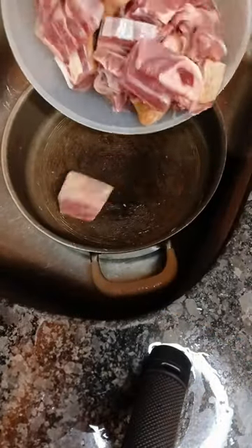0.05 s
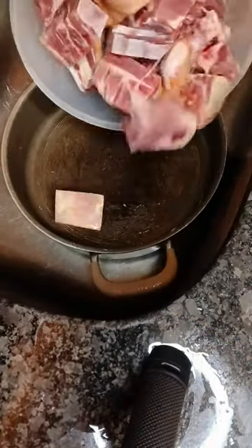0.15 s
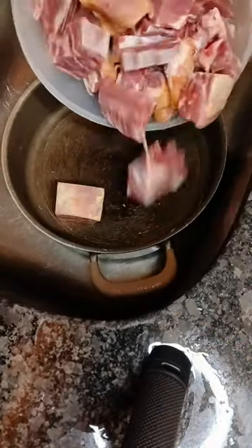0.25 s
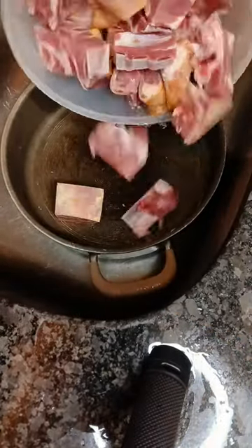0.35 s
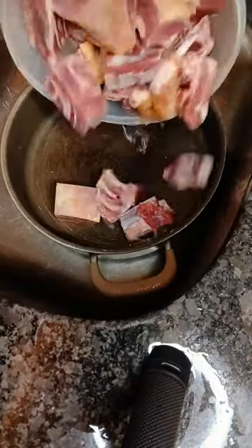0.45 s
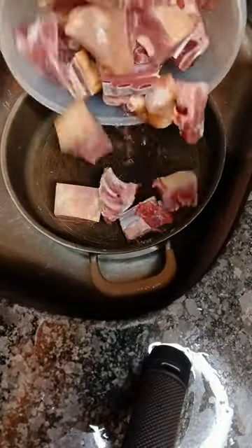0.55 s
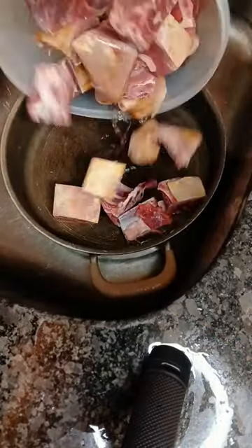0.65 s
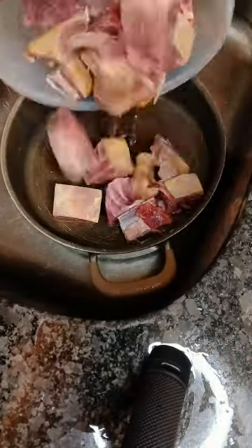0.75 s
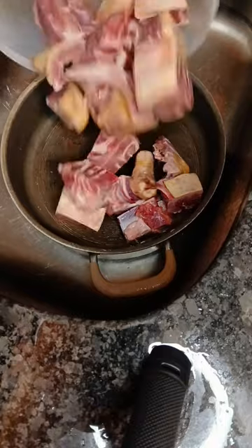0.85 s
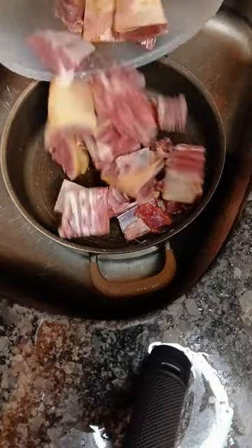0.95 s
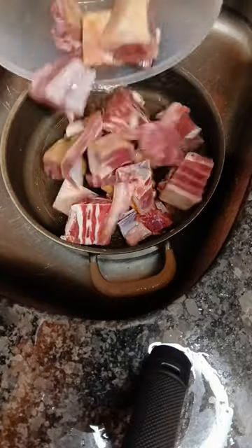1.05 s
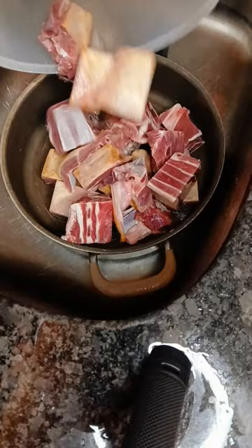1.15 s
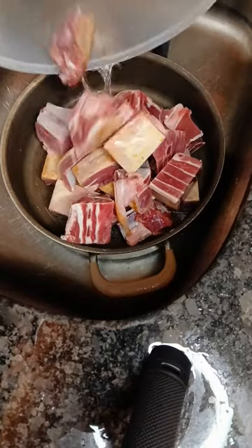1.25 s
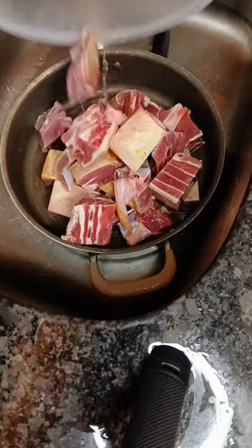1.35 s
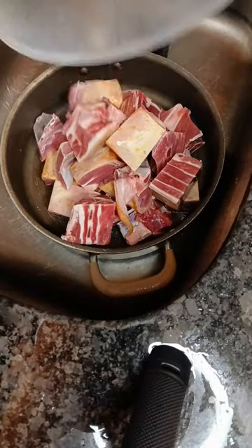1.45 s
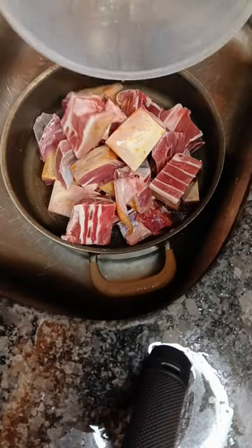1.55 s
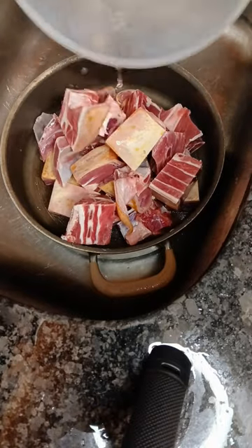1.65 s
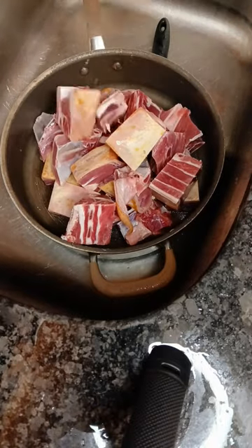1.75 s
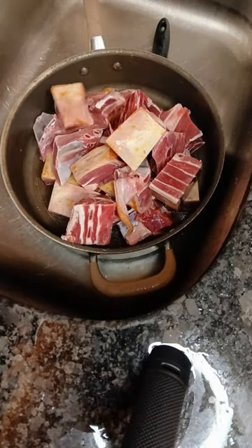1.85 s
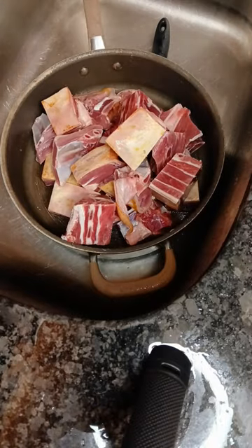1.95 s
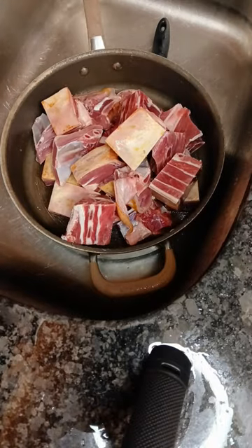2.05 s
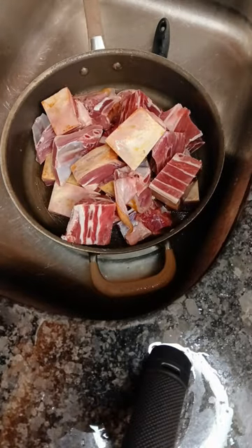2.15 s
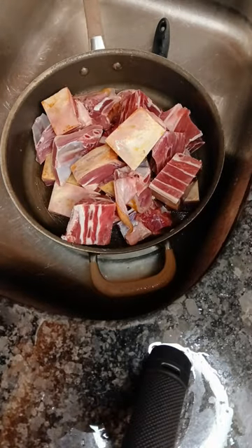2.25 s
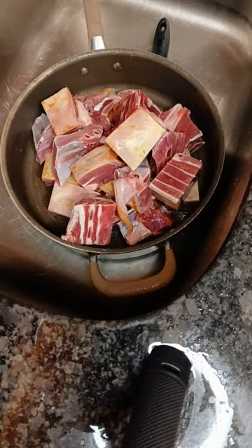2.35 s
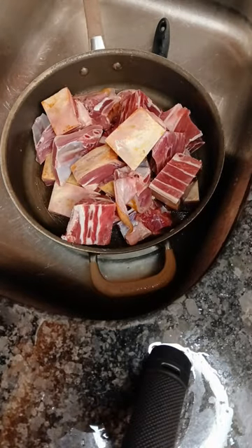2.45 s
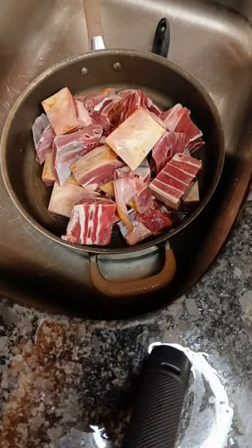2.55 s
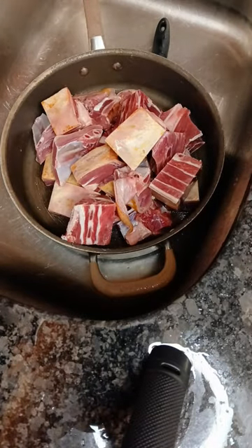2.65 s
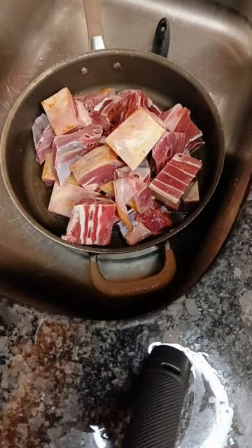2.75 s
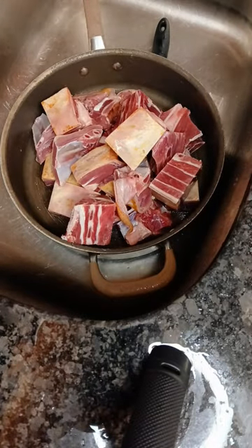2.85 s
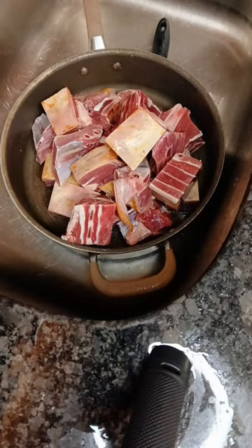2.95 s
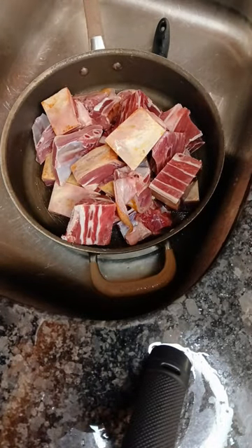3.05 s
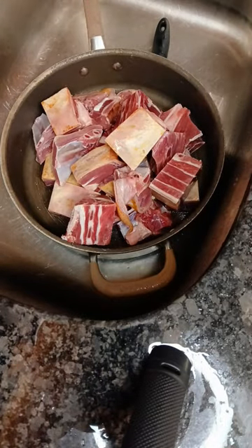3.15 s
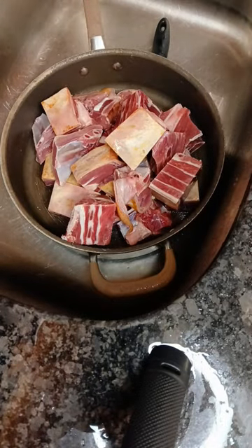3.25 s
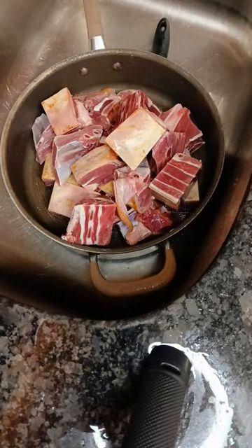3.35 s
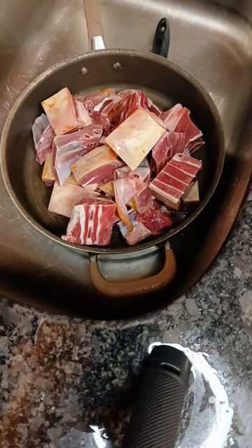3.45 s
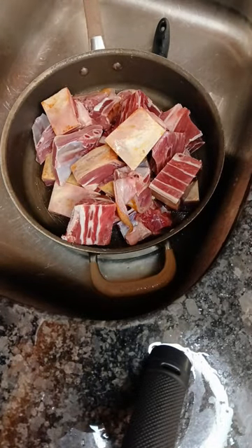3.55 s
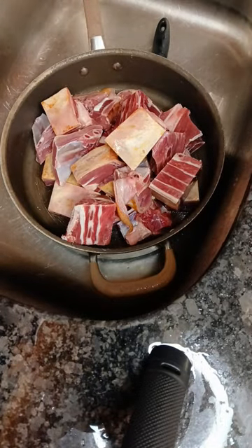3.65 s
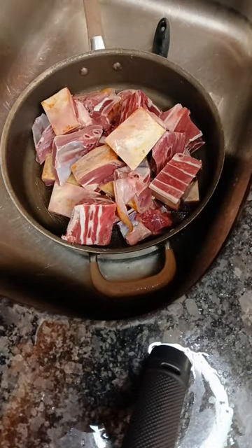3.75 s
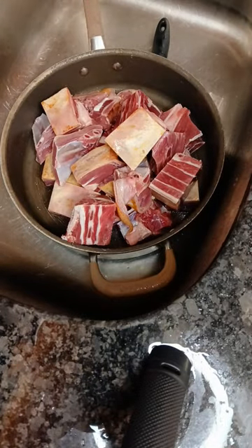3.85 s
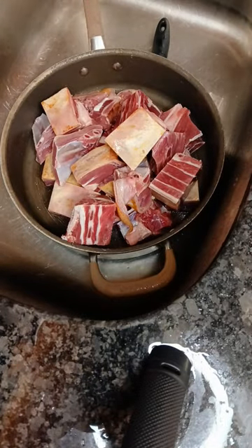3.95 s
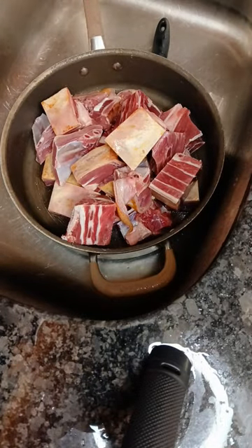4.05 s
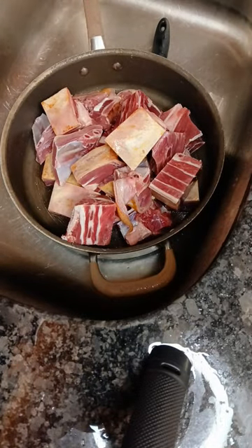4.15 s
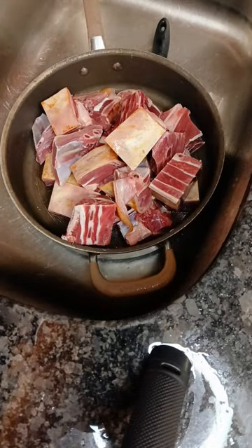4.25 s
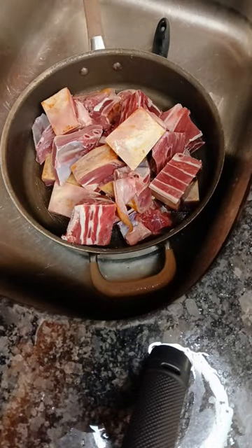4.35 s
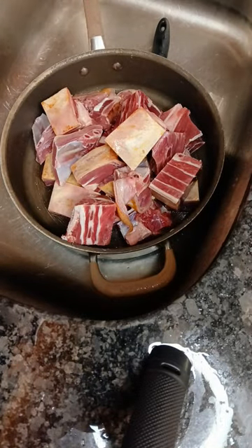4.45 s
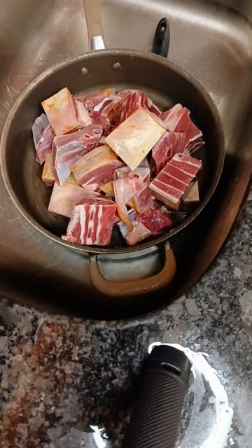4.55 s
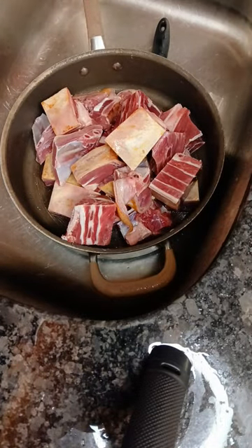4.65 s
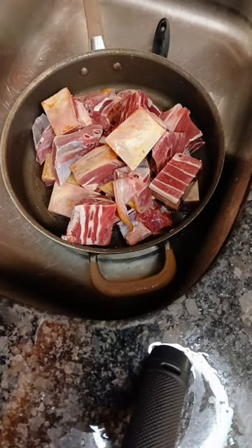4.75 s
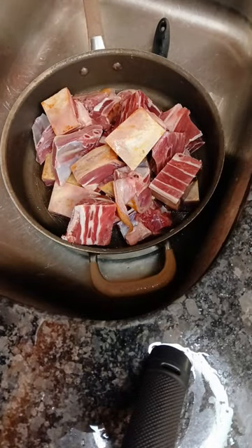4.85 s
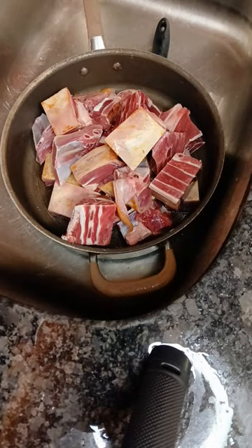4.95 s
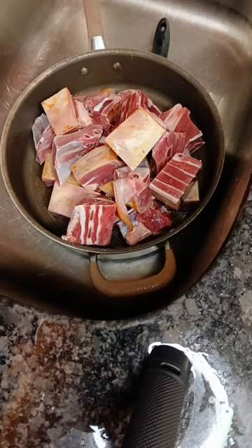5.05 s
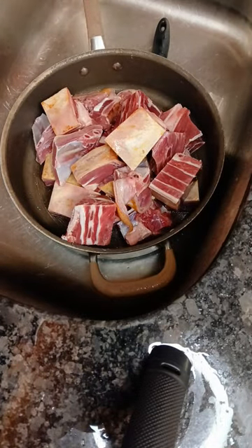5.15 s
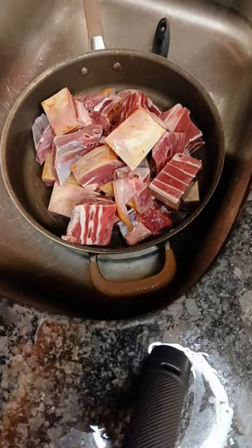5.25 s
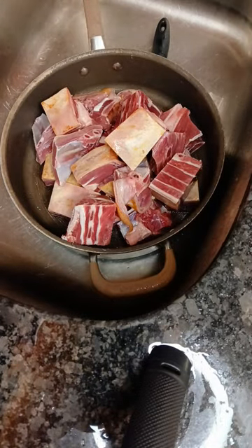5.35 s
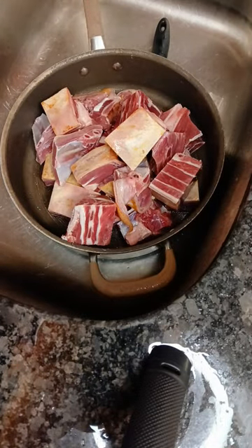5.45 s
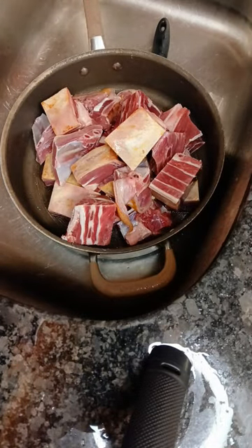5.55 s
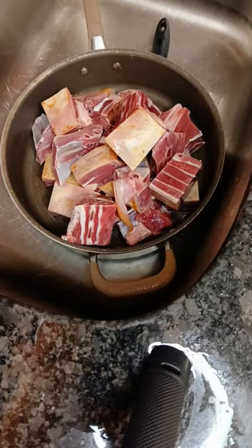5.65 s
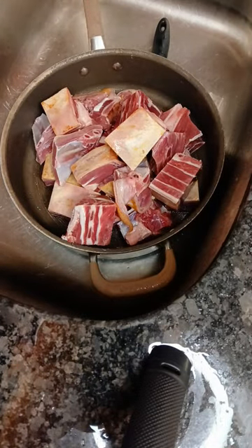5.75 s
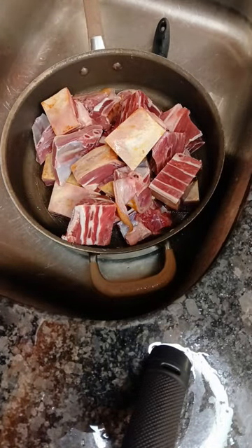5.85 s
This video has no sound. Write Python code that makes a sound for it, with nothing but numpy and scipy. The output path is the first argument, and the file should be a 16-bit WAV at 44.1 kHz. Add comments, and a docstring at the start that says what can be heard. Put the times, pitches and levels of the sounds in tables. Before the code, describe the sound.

Wet chunks of meat on the bone tumble into a metal pot in a steel sink, a quick run of thuds, knocks and splats with squelching and a short, dull ring. An empty plastic bowl is then set on a stone counter with a loud clack. Soft footsteps and scuffs follow, with a brief rattle and faint jingling of small metal parts. The sound is close, in a small kitchen with a low appliance hum.

```python
"""Wet meat on the bone tumbles from a plastic bowl into a metal pot in a steel sink, over kitchen hum.
The heap squelches; each chunk knocks, splats, rings the pot wall and thuds the bottom.
Near 2 s the empty bowl clacks down on the counter and small metal parts begin to jingle.
From 2.5 s soft footfalls thump the floor and soles scuff. At 3.2 s something loose briefly rattles
to rest. Jingling goes on to 5.4 s, steps to 5.7 s."""
import sys
import numpy as np
from scipy import signal
from scipy.io import wavfile
from scipy.ndimage import uniform_filter1d

SR = 44100
rng = np.random.default_rng(int(sys.argv[2]) if len(sys.argv) > 2 else 0)


def log_audio(samples):
    """Write samples as a 16-bit WAV file to the path given in sys.argv[1]."""
    # one column per channel
    frames = np.atleast_2d(samples).T
    # limit to full scale, then quantise
    limited = np.clip(frames, -1, 1)
    pcm = np.round(limited * 32767).astype(np.int16)
    wavfile.write(sys.argv[1], SR, pcm)


N = 260190

# chunks landing: start_s, knock_db, knock_hz, splat_db, bottom_db, wall_db
LANDINGS = [(0.0, -42, 1020, -66, -19, -17), (0.035, -14, 1100, -66, -28, -17),
            (0.101, -10.5, 2910, -24.5, -18.5, -17.5), (0.124, -20, 961, -53, -35, -15.5),
            (0.227, -17, 902, -58, -18, -12), (0.234, -4.5, 966, -17.5, -12, -12.5),
            (0.266, -10.5, 2290, -25, -23, -21.5), (0.305, 6, 1164, -27.5, -13.5, -21),
            (0.329, -15, 964, -48.5, -12.5, -12), (0.43, -3, 1330, -29, -27, -25),
            (0.48, -45, 1115, -27, -29, -33), (0.506, -3, 1010, -64, -14, -17),
            (0.598, -10.5, 902, -35, -15, -18), (0.613, -14.5, 3390, -22, -18, -8),
            (0.702, -22, 1121, -53, -36, -15.5), (0.737, -39, 1588, -29.5, -23, -25.5),
            (0.814, -15.5, 2196, -23, -10.5, -18.5), (0.882, -31, 3000, -21, -29, -29),
            (0.904, -14, 1320, -29.5, -28, -20), (0.932, -0.5, 1210, -24, -10.5, -15.5),
            (0.958, -44, 1230, -25, -16.5, -24), (0.989, -14, 1080, -23, -18, -21),
            (1.005, -7.5, 3510, -37, -18, -20), (1.06, -21, 1330, -26.5, -17.5, -31.5),
            (1.112, -6.5, 1060, -39, -27, -28.5), (1.245, -34, 1490, -33.5, -19, -52),
            (1.292, -35, 1460, -30, -42, -46), (1.314, -13, 5700, -45, -53, -25.5),
            (1.369, -29.5, 3380, -44, -28, -37), (1.446, -19.5, 1430, -32.5, -32.5, -54),
            (1.593, -32, 3300, -31.5, -44, -74)]
# pot wall modes: pitch_hz, level_db, t60_s
WALL_MODES = [(223.3, -7.5, 0.16), (258.2, -7, 0.13), (354, -5.5, 0.081), (511, -8, 0.044),
              (643.6, -6.5, 0.15), (874, -17, 0.175), (1020, -43, 0.038), (1140, -14.5, 0.46),
              (1200, -26.5, 0.093), (2100, -27.5, 0.21), (2990, -17, 0.21)]
# pot bottom beating with the sink under it: pitch_hz, level_db, t60_s
BOTTOM_MODES = [(112.75, 1.5, .45), (87.3, -7, 0.1)]
# room noise: frequency_hz, density_db
ROOM_SPECTRUM = [(25, -6), (60, 3.5), (120, -18.5), (300, -12), (500, -18.5), (1000, -27), (1550, -25.5),
                 (3400, -29.5), (6000, -28.5), (15000, -20)]
# appliance hum: pitch_hz, width_hz, level_db
HUM_BANDS = [(151, 10, -68), (246.4, 12.4, -60.5), (360.3, 8.6, -59.5)]
# bowl touching the counter: start_s, ring_db, clack_db
BOWL_HITS = [(1.847, -57, -18.5), (1.872, -49, -8), (2.109, -14.5, 14)]
# bowl modes: pitch_hz, level_db, t60_s
BOWL_MODES = [(80, -8, .45), (118, -4, .3), (250, -9, .2), (328, -6, .3), (425, -1.5, .2), (484, -1, .27),
              (533, -2, .2), (595, -5, .2), (883, -7, .2), (1071, -5, .22), (1405, -9, .18)]
# counter's dense response: frequency_hz, gain_db
CLACK_SPECTRUM = [(150, -10.5), (450, -4.5), (1000, -3.5), (2000, -8.5), (4000, -19.5), (8000, -27.5),
                  (15000, -38)]
# clearest touches of the metal parts: start_s, level_db, favoured_hz
TOUCHES = [(1.9719, -58, 2240), (2.487, -57, 1610), (2.586, -56, 1580), (2.7637, -55, 1570),
           (2.8948, -53, 1530), (3.519, -50.5, 1580), (3.606, -53, 2290), (4.0914, -55, 3190),
           (4.1508, -50, 3320), (4.2944, -55, 3210), (4.4734, -40, 1530), (4.573, -52.5, 1560),
           (4.6347, -44.5, 1520), (4.704, -50, 1550), (4.772, -58, 3240), (4.85, -57, 3130),
           (5.1672, -47.5, 2290), (5.2506, -55, 1550), (5.3407, -53, 1530), (5.378, -55, 3200)]
# modes of the metal parts: pitch_hz, level_db, t60_s
METAL_MODES = [(1592, 12, 0.09), (2294, 9.5, 0.061), (3150, 17, 0.059), (4340, 14, 0.072)]
# footfalls: start_s, slap_db, thump_db, thump_hz
FOOTFALLS = [(2.509, -59, -35.5, 51), (3.142, -35, -32, 94), (3.717, -14.5, -24.5, 61),
             (3.748, -14.5, -24.5, 92.5), (3.782, -24, -27, 109), (3.878, 0.5, -19, 95.6),
             (3.95, -13.5, -29, 118), (4.212, -29, -39, 64.6), (4.381, -37, -50, 66.4),
             (4.72, -19, -35, 96.4), (5.177, -24.5, -60, 62.4), (5.399, -4.5, -34, 82.5),
             (5.438, -4.5, -41, 72.6), (5.498, -8.5, -24.5, 72.5), (5.71, -7.5, -33, 83)]
# floorboard response: frequency_hz, gain_db
FLOOR_SPECTRUM = [(60, -10), (150, -4.5), (400, -2.5), (850, -22), (1450, -13.5), (2200, -22),
                  (4000, -27.5), (8000, -98)]
# soles dragging: start_s, rise_s, hold_s, level_db
DRAGS = [(2.61, 0.085, 0.0045, -43.5), (3.186, 0.033, 0.0093, -38.5), (3.667, 0.097, 0.011, -41.5),
         (3.869, 0.0069, 0.069, -30.5), (4.182, 0.063, 0.014, -37.5), (4.31, 0.085, 0.092, -35),
         (5.362, 0.01, 0.0084, -34), (5.396, 0.024, 0.015, -21.5), (5.49, .05, 0.092, -30.5),
         (5.7, 0.034, 0.024, -36)]
# sole friction: frequency_hz, density_db
SCUFF_SPECTRUM = [(60, 11), (300, -4), (800, -9), (1500, -7.5), (4000, -7), (6000, -6), (9000, -5),
                  (15000, -2)]
# taps of the loose object: start_s, level_db
RATTLE_TAPS = [(3.1916, -25), (3.264, -13.5), (3.3222, -19.5), (3.3807, -14.5), (3.4436, -19),
               (3.5598, -27)]
# its broad modes: pitch_hz, width_hz, level_db
RATTLE_MODES = [(870, 26, 4.5), (1425, 46, 7.5), (1538, 26, 10), (2020, 120, 0), (2430, 110, -3.5),
                (2770, 120, -1), (3260, 130, -6.5), (3970, 53, -8)]
# kitchen reverberation: frequency_hz, t60_s
ROOM_DECAY = [(100, 0.48), (500, 0.32), (2000, 0.36), (6000, 0.39), (14000, 0.31)]
# microphone response: frequency_hz, gain_db
MIC_RESPONSE = [(25, -22.5), (70, 6.5), (4200, -2), (6500, -15), (7600, -14), (8400, -8.5), (15650, -21),
                (15850, -29)]

SINK_SIDE, COUNTER_SIDE = (0.33, -0.00017), (-4.5, 0.0004)  # left_over_right_db, left_lag_s


def gain_of(db):
    return 10 ** (np.asarray(db) / 20)


def unit_rms(x):
    return x / np.sqrt(np.mean(x ** 2) + 1e-20)


def curve_at(points, hz):
    points_hz, values = np.transpose(points)
    return np.interp(np.log(hz + 1), np.log(points_hz + 1), values)


def highpass(x, hz, order=2):
    return signal.sosfilt(signal.butter(order, hz, "high", fs=SR, output="sos"), x)


def resonate(x, hz, width_hz, passes=1):
    """Resonance with unity gain at its centre."""
    for _ in range(passes):
        x = signal.lfilter(*signal.iirpeak(hz, hz / width_hz, SR), x)
    return x


def colour(x, spectrum):
    """Minimum-phase filter; returns one row per channel."""
    log_gain = curve_at(spectrum, np.fft.rfftfreq(4096, 1 / SR)) * np.log(10) / 20
    mirrored = np.concatenate([log_gain, log_gain[-2:0:-1]])
    taps = np.fft.ifft(np.exp(np.conj(signal.hilbert(mirrored)))).real[:2048]
    return signal.oaconvolve(np.atleast_2d(x), taps[None])[:, :np.shape(x)[-1]]


def patchy_noise(spectrum, patch_db, correlation):
    """Stereo noise whose spectrum has drifting patches."""
    frames, hz = N // 256 + 5, np.fft.rfftfreq(1024, 1 / SR)
    a, b, c, d, patches = rng.standard_normal((frames, 513, 5)).T
    patches = unit_rms(uniform_filter1d(uniform_filter1d(patches, 10, 0), 10, 1))
    left = a + 1j * b
    right = correlation * left + np.sqrt(1 - correlation ** 2) * (c + 1j * d)
    spectra = np.array([left, right]) * gain_of(curve_at(spectrum, hz)[:, None] + patch_db * patches)
    return unit_rms(signal.istft(spectra, nperseg=1024, noverlap=768)[1][:, :N])


def ring(modes, spread_db, length_s=0.3):
    """Decaying sines, faded out; the strike point varies each mode's share."""
    hz, db, t60_s = np.transpose(modes)[:, :, None]
    t = np.arange(round(length_s * SR)) / SR
    share_db = spread_db * rng.standard_normal((len(modes), 1))
    partials = gain_of(db + share_db - 60 * t / t60_s) * np.sin(2 * np.pi * hz * t)
    return partials.sum(0) * (1 - (t / t[-1]) ** 4)


def burst(t60_s, rise_s, length_s=0.3):
    """Noise with a short rise and a decay."""
    t = np.arange(round(length_s * SR)) / SR
    return rng.standard_normal(len(t)) * gain_of(-60 * t / t60_s) * (1 - np.exp(-t / rise_s))


def soften(x, contact_ms):
    """Longer contact smooths away the upper modes."""
    push = np.hanning(max(round(contact_ms * SR / 1000), 3) + 2)
    return signal.oaconvolve(x, push / push.sum())[:len(x)]


def place(mix, start_s, sound, pan_db=0, lag_s=0, scatter=2.98):
    """Add to each channel with its own lag and quick treble reflections off steel and stone."""
    taps = np.diff(rng.standard_normal((2, 257))) * gain_of(-60 * np.arange(256) / SR / 0.008)
    taps = scatter * taps / np.linalg.norm(taps, axis=1)[:, None]
    taps[:, 0] = 0.64  # direct path
    for channel, side in enumerate((0.5, -0.5)):
        first = max(round((start_s + side * lag_s) * SR), 0)
        span = mix[channel, first:first + len(sound)]
        span += gain_of(side * pan_db) * signal.oaconvolve(sound, taps[channel])[:len(span)]


def bone_knock(start_s, pitch_hz, fill_db_per_s=10.5):
    """Bone snaps, the joint rattles; bare metal rings, less as the pot fills."""
    crack = burst(0.069, 0.0027) + 1.63 * burst(0.012, 0.000067)
    knock = 1.06 * resonate(crack, pitch_hz, 1.13 * pitch_hz, passes=2)
    edge = 0.62 * resonate(crack, 2200, 1300, passes=2)
    note = 1.6 * resonate(crack, pitch_hz, 0.12 * pitch_hz)
    metal = soften(ring(WALL_MODES[4:], spread_db=5.4), contact_ms=0.23)
    return knock + edge + note + gain_of(-11.5 - fill_db_per_s * start_s) * metal


def meat(smother_s=0.064, weight_delay_s=0.0061):
    """Each chunk knocks, splats and rings the pot wall; then its weight thuds the bottom."""
    out = np.zeros((2, N))
    gaps_s = np.diff([row[0] for row in LANDINGS] + [N / SR])
    for gap_s, (start_s, knock_db, knock_hz, splat_db, bottom_db, wall_db) in zip(gaps_s, LANDINGS):
        detune = 1 + 0.0481 * rng.standard_normal()  # by the chunk's weight
        modes = [(hz * detune, db, t60_s) for hz, db, t60_s in BOTTOM_MODES]
        ring_s = min(gap_s + smother_s, 0.3)  # the next chunk stops it
        bottom = soften(ring(modes, spread_db=1.65, length_s=ring_s), contact_ms=7.4)
        place(out, start_s + weight_delay_s, gain_of(bottom_db) * bottom)
        wall = gain_of(-1.5) * soften(ring(WALL_MODES, spread_db=5.3), contact_ms=1.0)
        flesh = gain_of(12) * resonate(burst(0.11, 0.0036), 330, 450)
        bone = bone_knock(start_s, knock_hz)
        splat = highpass(burst(0.095, 0.00054) + 2.5 * burst(0.0031, 0.00005), 4500)
        impact = gain_of(wall_db) * (wall + flesh) + gain_of(knock_db) * bone + gain_of(splat_db) * splat
        place(out, start_s, impact, *SINK_SIDE)
    return out


def squelch(ticks_per_s=2100, empty_s=1.13, rise_db_per_s=17, fall_db_per_s=118):
    """Wet chunks peel off the bowl in tiny ticks, a few large, swelling until it is empty."""
    t = np.arange(N) / SR
    sizes = gain_of(3.1 * np.minimum(rng.exponential(1, (2, N)), 4))
    impulses = sizes * (rng.random((2, N)) < ticks_per_s / SR)
    tick = np.diff(burst(0.0027, 0.0001, length_s=0.02))
    ticks = signal.oaconvolve(impulses, tick[None])[:, :N]
    before_s, after_s = np.maximum(empty_s - t, 0), np.maximum(t - empty_s, 0)
    return gain_of(-36.5 - rise_db_per_s * before_s - fall_db_per_s * after_s) * unit_rms(ticks)


def room_tone():
    """An appliance's wavering hum, as narrow noise bands, over broad room noise."""
    drive = rng.standard_normal(N)
    hum = sum(gain_of(db) * unit_rms(resonate(drive, hz, width_hz, passes=2))
              for hz, width_hz, db in HUM_BANDS)
    return hum + gain_of(-46) * patchy_noise(ROOM_SPECTRUM, patch_db=1.5, correlation=0.2)


def bowl(ring_delay_s=0.00222):
    """Plastic on stone: a dense clack, then the bowl's low modes."""
    out = np.zeros((2, N))
    for start_s, ring_db, clack_db in BOWL_HITS:
        body = soften(ring(BOWL_MODES, spread_db=0.25), contact_ms=0.3)
        place(out, start_s + ring_delay_s, gain_of(ring_db) * body, *COUNTER_SIDE, scatter=1.0)
        clack = colour(burst(0.059, 0.0011), CLACK_SPECTRUM)[0]
        place(out, start_s, gain_of(clack_db) * clack, *COUNTER_SIDE, scatter=1.1)
    return out


def jingle(faint_count=46, from_s=1.95, to_s=5.4, tilt_db_per_octave=20, rise_s=0.0025):
    """Small metal parts touch, each time favouring one mode; faint touches fall at random."""
    out, faint = np.zeros((2, N)), []
    for when, size, pick in rng.random((faint_count, 3)):
        favoured_hz = METAL_MODES[int(3 * pick)][0]  # one of the lower three
        faint.append((from_s + (to_s - from_s) * when, -61 + 2.5 * (2 * size - 1), favoured_hz))
    for start_s, level_db, favoured_hz in TOUCHES + faint:
        modes = [(hz, db - tilt_db_per_octave * abs(np.log2(hz / favoured_hz)), t60_s)
                 for hz, db, t60_s in METAL_MODES]
        chime = ring(modes, spread_db=3.8, length_s=0.15)
        attack = np.minimum(np.arange(len(chime)) / SR / rise_s, 1)
        place(out, start_s, gain_of(level_db) * chime * attack, *COUNTER_SIDE, scatter=0.31)
    return out


def footfalls(hollow_hz=290.4, hollow_t60_s=0.17, board_hz=834):
    """Each foot thumps, with a lumpy rumble; its slap sounds two notes of the floor."""
    out = np.zeros((2, N))
    for start_s, slap_db, thump_db, thump_hz in FOOTFALLS:
        push = soften(ring([(thump_hz, 0, 0.2)], spread_db=0), contact_ms=6.3)
        rumble = 7 * resonate(burst(0.34, 0.016), thump_hz, 36)
        place(out, start_s, gain_of(thump_db) * (push + rumble))
        note_hz = hollow_hz * (1 + 0.088 * rng.standard_normal())  # shifts with where the foot lands
        hollow = 0.097 * soften(ring([(note_hz, 0, hollow_t60_s)], spread_db=1.7), contact_ms=1.6)
        board = 0.52 * resonate(burst(0.36, 0.001), board_hz, 135)
        slap = colour(burst(0.42, 0.0028), FLOOR_SPECTRUM)[0]
        place(out, start_s, gain_of(slap_db) * (slap + hollow + board), *COUNTER_SIDE)
    return out


def scuffs(rise_db=27, fall_db_per_s=155):
    """Dragging soles: friction noise swells, holds and dies."""
    t, envelope = np.arange(N) / SR, np.zeros(N)
    for start_s, rise_s, hold_s, level_db in DRAGS:
        peak_s = start_s + rise_s
        before_s, after_s = np.maximum(peak_s - t, 0), np.maximum(t - peak_s - hold_s, 0)
        envelope += gain_of(level_db - rise_db * before_s / rise_s - fall_db_per_s * after_s)
    return envelope * patchy_noise(SCUFF_SPECTRUM, patch_db=1.5, correlation=0.3)


def rattle():
    """Something loose rocks to rest; each tap drives its broad modes."""
    out = np.zeros((2, N))
    for start_s, level_db in RATTLE_TAPS:
        tap = burst(0.031, 0.00046, length_s=0.15)
        body = sum(gain_of(db) * resonate(tap, hz, width_hz) for hz, width_hz, db in RATTLE_MODES)
        place(out, start_s, gain_of(level_db) * body, *COUNTER_SIDE, scatter=1.0)
    return out


def kitchen_reverb(x, slot_samples=20):
    """One reflection of random sign per slot; each band decays at its own rate."""
    taps = np.zeros((2, SR // 2))
    slots = np.arange(200, SR // 2 - slot_samples, slot_samples)
    arrivals = slots + rng.integers(0, slot_samples, (2, len(slots)))
    np.put_along_axis(taps, arrivals, rng.choice([-1., 1.], arrivals.shape), 1)
    hz, t, spectra = signal.stft(taps, SR, nperseg=512)
    decay = gain_of(-60 * t / curve_at(ROOM_DECAY, hz)[:, None])
    tail = signal.istft(spectra * decay, SR, nperseg=512)[1]
    return signal.fftconvolve(x, tail / np.linalg.norm(tail[0]), axes=1)[:, :N]


def scene():
    """All sources, their reverberation and the room tone."""
    pour = meat() + squelch()
    set_down = bowl()
    parts = jingle() + rattle()
    feet = footfalls() + scuffs()
    send = gain_of(-9.5) * pour + gain_of(-4) * (set_down + feet) + gain_of(-6.5) * parts
    reverb = kitchen_reverb(highpass(send, 180))  # a small room returns little deep bass
    return pour + set_down + parts + feet + reverb + room_tone()


def record(dry, cutoff_hz=16650):
    """Stereo microphone: near-mono bass, coloration, soft clipping, band limit."""
    mid, side = (dry[0] + dry[1]) / 2, (dry[0] - dry[1]) / 2
    side = highpass(side, 350, order=1)  # two close ports hear the bass alike
    coloured = colour([mid + side, mid - side], MIC_RESPONSE)
    clipped = 1.49 * np.tanh(coloured / 1.582)
    lowpass = signal.firwin(511, cutoff_hz, window=("kaiser", 9), fs=SR)
    return signal.oaconvolve(clipped, lowpass[None], "same")


dry = scene()
out = record(dry)
log_audio(out)
```